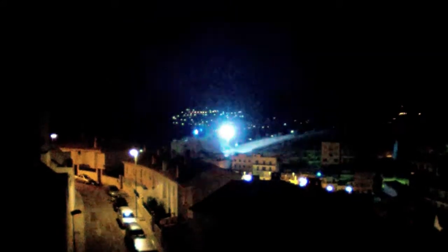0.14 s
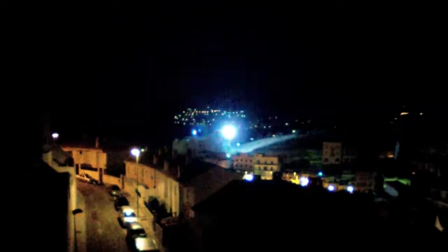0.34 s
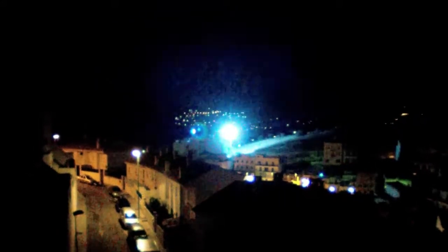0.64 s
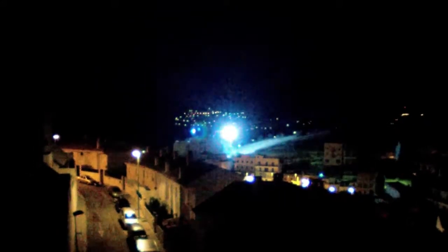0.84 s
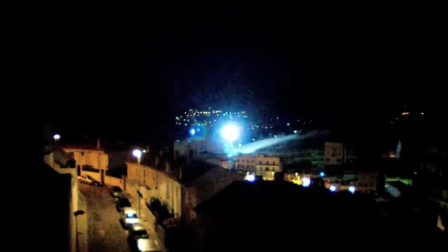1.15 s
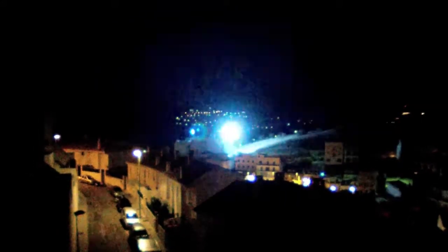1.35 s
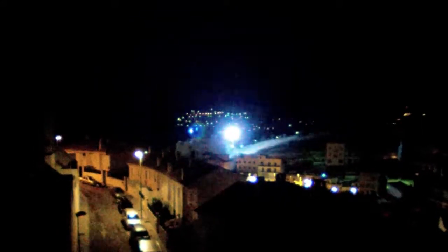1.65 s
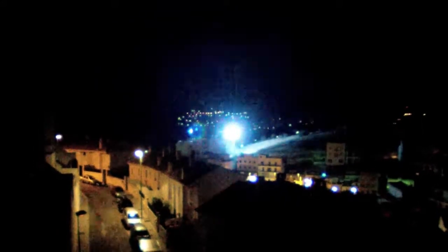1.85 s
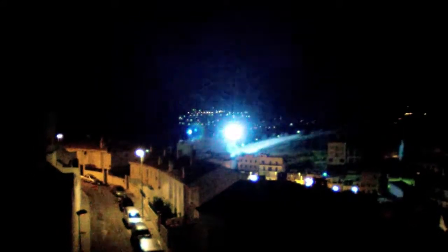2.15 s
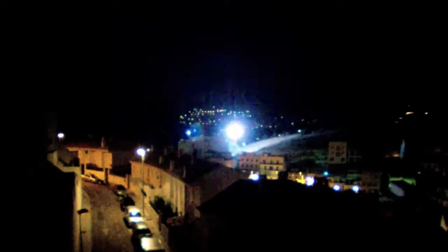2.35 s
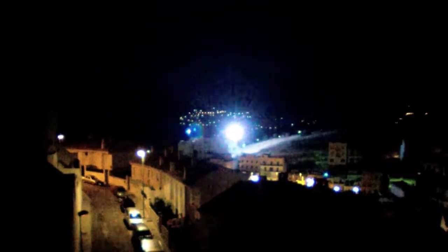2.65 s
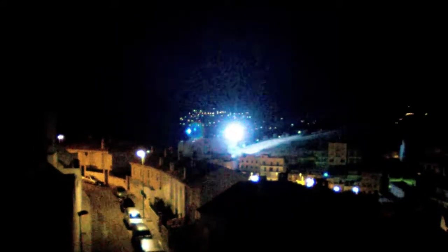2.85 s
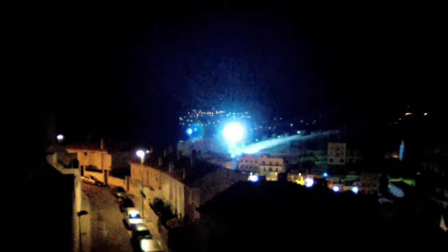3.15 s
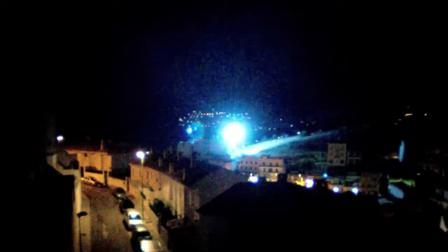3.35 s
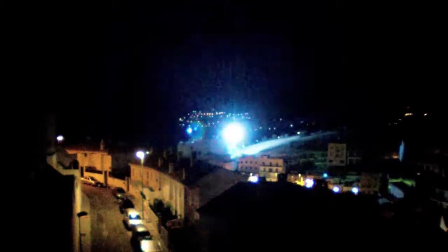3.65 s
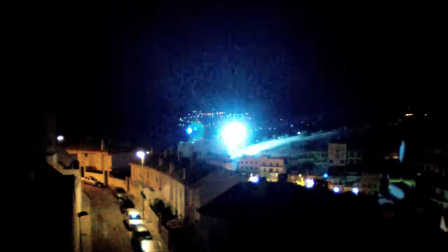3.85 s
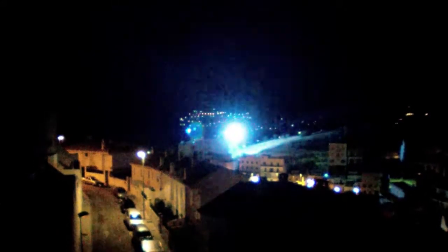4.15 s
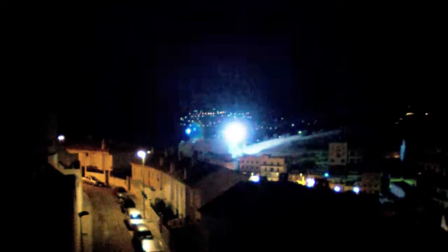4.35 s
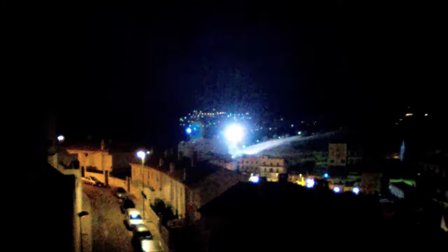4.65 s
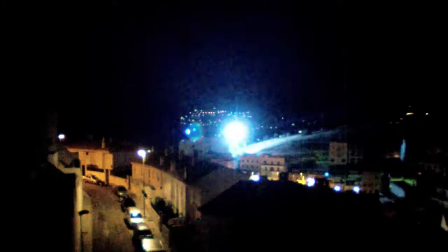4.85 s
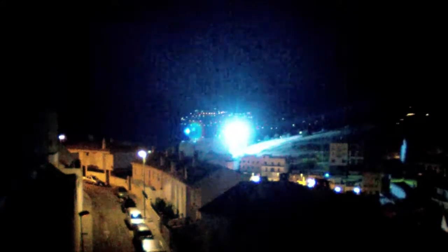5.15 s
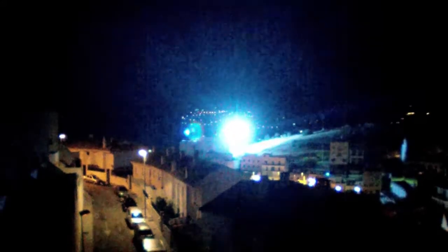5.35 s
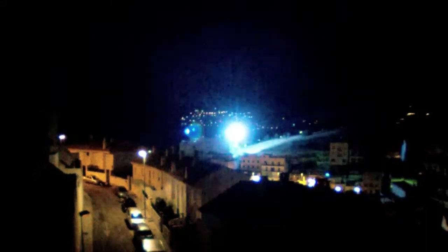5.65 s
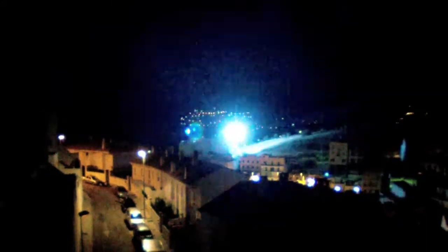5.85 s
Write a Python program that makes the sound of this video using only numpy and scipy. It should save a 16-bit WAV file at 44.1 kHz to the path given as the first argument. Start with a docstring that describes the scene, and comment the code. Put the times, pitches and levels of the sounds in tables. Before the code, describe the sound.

Electric arcing sizzles and crackles across a hillside town, broken by uneven snaps over faint night air.

```python
"""A distant pylon arcing at night

A high-voltage arc sizzles across a hillside town: a stream of tiny sparks with irregular loud snaps,
all dulled by absorption along the air path. Nearby walls reflect each spark within milliseconds and
the town scatters a faint wash, over night air and the microphone's hiss and thin whine."""
import sys
import numpy as np
from scipy import signal
from scipy.fft import rfft, irfft, next_fast_len
from scipy.io import wavfile
from scipy.ndimage import map_coordinates

SR = 44100
rng = np.random.default_rng(int(sys.argv[2]) if len(sys.argv) > 2 else 0)


def wav_out(sig):
    """Save sig, one row per channel (or a flat mono array), as 16-bit PCM at SR to the path in sys.argv[1]."""
    wavfile.write(sys.argv[1], SR, np.round(np.clip(np.atleast_2d(sig).T, -1, 1) * 32767).astype(np.int16))


N = 264159

# The loud discharges. Each row: start in seconds, relative level in dB, brightness in dB.
DISCHARGES = [(0.021, -15.5, -17.5), (0.103, -22.5, -17), (0.114, -24, -19), (0.311, -21.5, -21),
              (0.442, -24, -18), (0.469, -22.5, -26), (0.572, -23.5, -20), (0.592, -21, -15),
              (0.619, -18.5, -20), (0.832, -21, -24), (0.917, -21, -15), (0.988, -25, -29),
              (1.12, -25.5, -18), (1.131, -15, -27), (1.349, -17, -21), (1.48, -26.5, -17),
              (1.504, -25, -23), (1.585, -22, -16), (1.701, -20.5, -26), (1.807, -20.5, -13),
              (1.971, -14.5, -20), (2.05, -14.5, -19), (2.081, -21, -11), (2.141, -19, -10),
              (2.18, -22, -19), (2.258, -19, -10), (2.288, -17, -8), (2.312, -23, -14),
              (2.371, -17.5, -17.5), (2.451, -21, -20), (2.484, -21.5, -19), (2.529, -8.5, -23),
              (2.664, -16.5, -22.5), (2.823, -23.5, -16), (2.872, -24.5, -19), (2.96, -23.5, -14),
              (3.041, -31, -17), (3.09, -22.5, -30), (3.239, -28, -24), (3.56, -22.5, -18),
              (3.597, -26, -22), (3.661, -11, -21), (3.808, -20.5, -15.5), (3.998, -18, -5),
              (4.078, -16.5, -15), (4.143, -16, -7), (4.181, -18.5, -25), (4.241, -19.5, -12),
              (4.27, -22.5, -18), (4.341, -17, -22), (4.35, -20, -13), (4.358, -15, -11),
              (4.46, -18.5, -18), (4.501, -20, -24.5), (4.724, -25, -20), (4.767, -22.5, -13),
              (4.81, -24, -18), (4.941, -22.5, -16), (4.961, -22, -22), (5.02, -25, -15), (5.058, -21, -17),
              (5.068, -13, -13.5), (5.212, -24, -8), (5.251, -21, -25), (5.399, -21, -12),
              (5.462, -2.5, -18.5), (5.629, -13.5, -17), (5.82, -20.5, -23)]
TYPICAL_SNAP_DB, TYPICAL_TREBLE_DB = -18, -17.5


def amp(db):
    """Amplitude grows tenfold for every 20 dB."""
    return 10 ** (np.asarray(db) / 20)


def unit(x):
    """Normalisation to an rms of 1."""
    return x / np.sqrt(np.mean(x ** 2) + 1e-20)


def along(points, hz):
    """Interpolation of (Hz, value) points on a logarithmic frequency axis."""
    knots_hz, values = np.transpose(points)
    return np.interp(np.log(hz + 1), np.log(knots_hz), values)


def envelope(points):
    """Linear interpolation of (seconds, value) points at every sample."""
    return np.interp(np.arange(N) / SR, *np.transpose(points))


def filtered(x, response):
    """A linear filter multiplies the spectrum by its frequency response."""
    size = next_fast_len(N + SR // 2)
    return irfft(rfft(x, size) * response(np.fft.rfftfreq(size, 1 / SR)), size)[:N]


def noise(spectrum):
    """Filtering colours white noise; the result has an rms of 1."""
    return unit(filtered(rng.standard_normal(N), lambda hz: amp(along(spectrum, hz))))


def firing(per_second, bunching, mains_hz=50):
    """Sparks fire as a Poisson process, a little denser at both voltage crests of each mains cycle."""
    crest = np.cos(2 * np.pi * 2 * mains_hz * np.arange(N) / SR)
    fires = rng.random(N) < per_second / SR * (1 + bunching * crest)
    return unit(fires - fires.mean())


def spark(tilt_db_per_octave, pivot_hz=1300, size=2048):
    """One pressure pulse, dulled by air absorption; a shorter spark has a brighter spectrum."""
    # A spark after the long air path. Each row: frequency in Hz, relative level in dB.
    spectrum = [(100, -60), (350, -28), (600, -12), (850, -10), (980, -0.5), (1130, 2), (1320, -2),
                (1540, -6), (1850, -2.5), (2280, -12.5), (2900, -13), (3450, -27.5), (5000, -48),
                (6000, -39), (7200, -49.5)]
    hz = np.fft.rfftfreq(size, 1 / SR)
    octaves = np.clip(np.log2((hz + 1) / pivot_hz), -.6, .9)
    magnitude = amp(along(spectrum, hz) + tilt_db_per_octave * octaves)
    # Folding the cepstrum makes the pulse causal, with minimum phase.
    cepstrum = irfft(np.log(magnitude))
    cepstrum[1:size // 2] *= 2
    cepstrum[size // 2 + 1:] = 0
    pulse = irfft(np.exp(rfft(cepstrum)))
    return -pulse / np.abs(pulse).max()


def walls(x, echo_db, jitter_s, diffraction_hz=500, roughness_hz=2500):
    """Reflection adds two duller echoes, whose delays vary with the spot where the arc strikes."""
    # Two nearby walls. Each row: delay in seconds, relative level in dB.
    reflections = [(.00538, -8), (.0124, -8)]
    size = next_fast_len(len(x) + SR // 40)
    hz = np.fft.rfftfreq(size, 1 / SR)
    echoes = 0
    for delay, db in reflections:
        arrival = delay + jitter_s * rng.standard_normal()
        echoes += amp(db + echo_db) * np.exp(-2j * np.pi * hz * arrival)
    echoes *= hz ** 2 / (hz ** 2 + diffraction_hz ** 2)  # long waves bend round the walls
    echoes /= 1 + (hz / roughness_hz) ** 4  # short waves scatter off their roughness
    return irfft(rfft(x, size) * (1 + echoes), size)[:len(x)]


def arc_state(burn_db=-1.5, waver_db=1.04, waver_hz=11, flare_db=-40, rise_s=0.014, fall_s=0.089):
    """Incoherent powers add: a wavering burn and a flare round each snap set gain and extra treble."""
    # The arc's burning between flares. Each row: time in seconds, relative level in dB.
    burn = [(0.0, -37), (0.57, -40.5), (1.37, -38.5), (1.79, -43.5), (2.03, -37), (2.15, -42), (2.5, -38),
            (2.65, -40.5), (3.49, -41), (3.74, -40), (4.0, -41), (4.29, -37), (4.79, -37.5), (5.34, -37),
            (5.59, -33), (5.99, -38)]
    t = np.arange(N) / SR
    knots = rng.standard_normal(int(N * waver_hz / SR) + 4)
    waver = map_coordinates(knots, [t * waver_hz])
    power = amp(envelope(burn) + burn_db + waver_db * waver) ** 2
    weighted_treble = np.zeros(N)
    size_share, colour_share = 0.51, 0.31  # dB of flare per dB of its snap
    for start, db, treble_db in DISCHARGES:
        time_constants = np.maximum((start - t) / rise_s, (t - start) / fall_s)
        peak = amp(flare_db + size_share * (db - TYPICAL_SNAP_DB))
        flare = (peak * np.exp(-np.minimum(time_constants, 20))) ** 2
        power += flare
        weighted_treble += flare * colour_share * (treble_db - TYPICAL_TREBLE_DB)
    return np.sqrt(power), weighted_treble / power


def sizzle(split_hz=1650, max_tilt=6, spots=8):
    """Shot noise: small sparks, dull to bright, superpose as the writhing arc swells and brightens."""
    # Brightness between flares. Each row: time in seconds, treble relative to the low band in dB.
    brightness = [(0, -7), (3.1, -7), (3.4, -5), (4.2, -5.5), (4.9, -7), (5.3, -6), (5.99, -9.5)]
    stream = np.zeros(N)
    for tilt in np.linspace(-max_tilt, max_tilt, spots):
        impulses = firing(per_second=125, bunching=.22)
        pulses = signal.oaconvolve(impulses, spark(tilt))[:N]
        stream += walls(pulses, echo_db=-2.5, jitter_s=0.00012)
    strength, flare_treble_db = arc_state()
    low = filtered(stream, lambda hz: 1 / (1 + (hz / split_hz) ** 10))
    high = amp(envelope(brightness) + flare_treble_db) * unit(stream - low)
    return strength * unit(unit(low) + high)


def scatter(t60_s, rise_s):
    """A diffuse response: random arrivals of total energy 1 build up and decay exponentially."""
    t = np.arange(int(t60_s * SR) + 2) / SR
    decay = np.exp(-np.log(1000) * t / t60_s)
    cloud = rng.standard_normal(len(t)) * decay * (1 - np.exp(-t / rise_s))
    return cloud / np.linalg.norm(cloud)


def snaps(gain_db=-0.5, tilt_share=0.82, branch_db=-1.5, lag_s=.0017):
    """An extended source: each big discharge cracks, and sound from its crooked branches follows."""
    track = np.zeros(N)
    for start, db, treble_db in DISCHARGES:
        pulse = spark(tilt_share * (treble_db - TYPICAL_TREBLE_DB))
        channel = amp(branch_db) * scatter(t60_s=0.063, rise_s=0.0015)
        channel[0] += 1  # the main crack
        crack = walls(signal.fftconvolve(pulse, channel), echo_db=-1.5, jitter_s=.00008)
        span = track[round((start + lag_s) * SR):][:len(crack)]
        span += amp(db + gain_db) * crack[:len(span)]
    return track


def town(x, wash_db=-16):
    """Scattering from far houses and slopes adds a faint reverberant wash."""
    return x + amp(wash_db) * signal.fftconvolve(x, scatter(t60_s=1.0, rise_s=0.075))[:N]


def night_air(level_db=-48):
    """Ambient noise: the distant town and the night air merge into a steady, low rush."""
    # The ambient spectrum. Each row: frequency in Hz, relative spectral density in dB.
    spectrum = [(20, -12.5), (60, -11.5), (120, -6.5), (250, -2), (500, 1.5), (900, -1), (2000, -18),
                (3200, -8.5), (4500, -14), (6000, -19), (9000, -31)]
    return amp(level_db) * noise(spectrum)


def hiss(level_db=-53.5):
    """The microphone's self-noise rises towards the top of the spectrum."""
    # The noise floor. Each row: frequency in Hz, relative spectral density in dB.
    spectrum = [(3000, -17), (8000, -15), (9700, -13), (12000, -7.5), (14000, -3), (15700, 1)]
    return amp(level_db) * noise(spectrum)


def whine(linewidth_hz=6):
    """Phase drift broadens each of the microphone's thin electronic tones into a narrow band."""
    # The tones. Each row: frequency in Hz, level in dB before the swell.
    partials = [(2998, -64), (11999, -81), (15735, -72)]
    # Their swell and fade. Each row: time in seconds, gain in dB.
    swell = [(0, -3), (2.8, 4), (4.1, 4), (5.99, -4)]
    t = np.arange(N) / SR
    tones = np.zeros(N)
    for hz, db in partials:
        drift = np.cumsum(rng.standard_normal(N)) * np.sqrt(2 * np.pi * linewidth_hz / SR)
        tones += np.sqrt(2) * amp(db) * np.sin(2 * np.pi * hz * t + drift)
    return tones * amp(envelope(swell))


def scene():
    """Superposition of the arc among the houses and the quiet background, in one channel."""
    arc = town(snaps() + sizzle())
    return (arc + night_air() + hiss() + whine())[None]


def record(dry, port_hz=2900, width_hz=900, tick_db=-3, tick_hz=6000, tick_width_hz=1300, top_hz=15850):
    """Group delay at the microphone port holds back treble; overload adds a tick to the loudest snap."""
    port = lambda hz: port_hz ** 2 - hz ** 2 + 1j * hz * width_hz
    ring = lambda hz: 1j * hz * tick_width_hz / (tick_hz ** 2 - hz ** 2 + 1j * hz * tick_width_hz)
    pressure = filtered(dry[0], lambda hz: np.conj(port(hz)) / port(hz))  # all-pass
    tick = amp(tick_db) * filtered(pressure ** 3, lambda hz: ring(hz) ** 2)  # cubic distortion
    return filtered(pressure + tick, lambda hz: hz < top_hz)[None]


dry = scene()
out = record(dry)
wav_out(out)
```